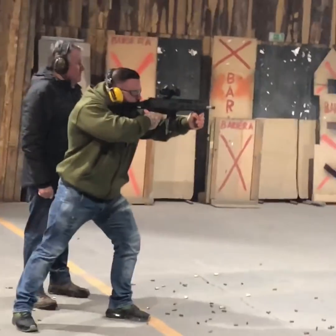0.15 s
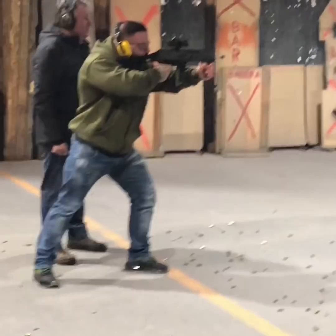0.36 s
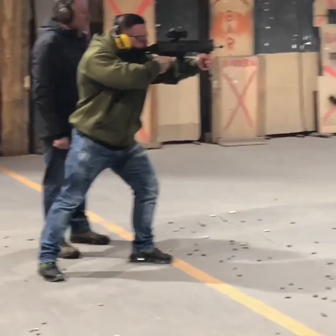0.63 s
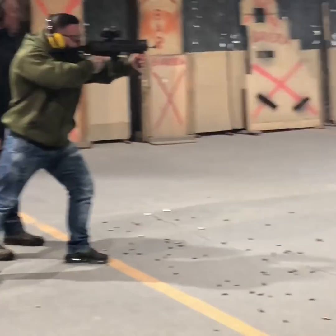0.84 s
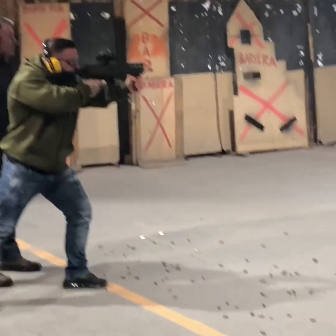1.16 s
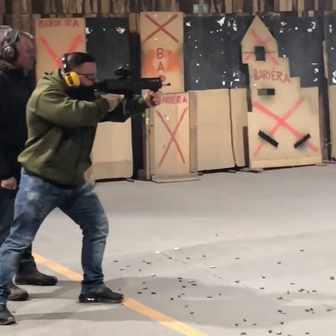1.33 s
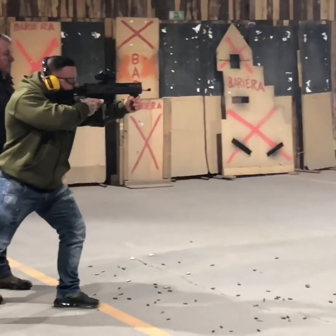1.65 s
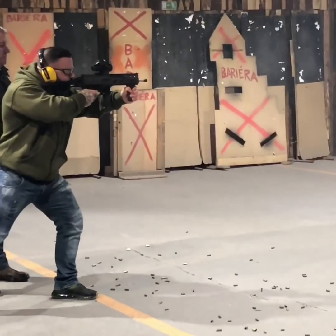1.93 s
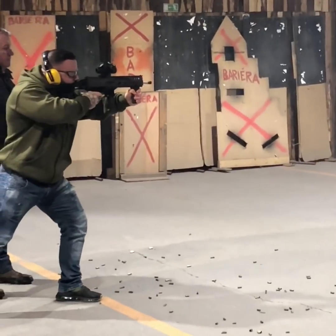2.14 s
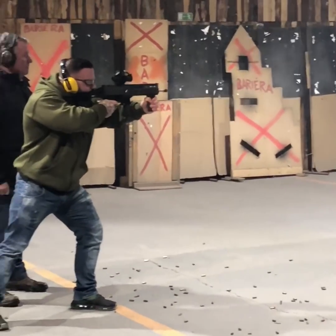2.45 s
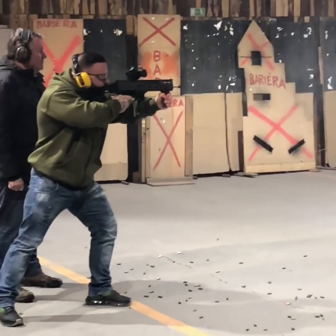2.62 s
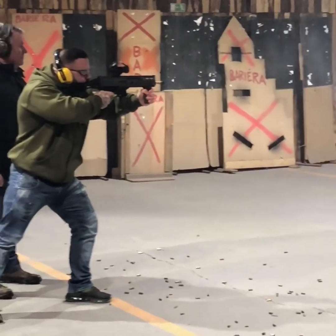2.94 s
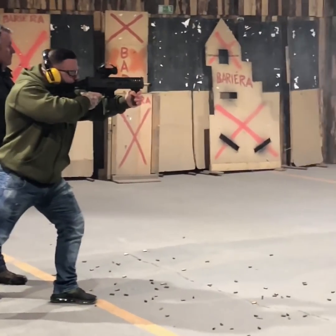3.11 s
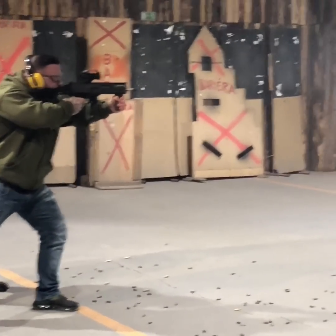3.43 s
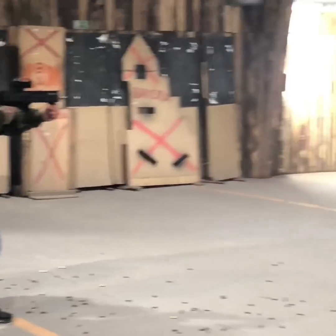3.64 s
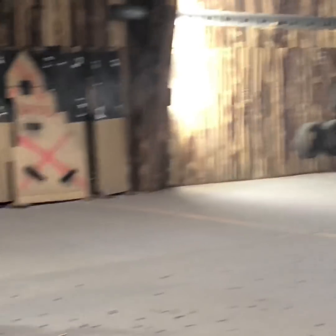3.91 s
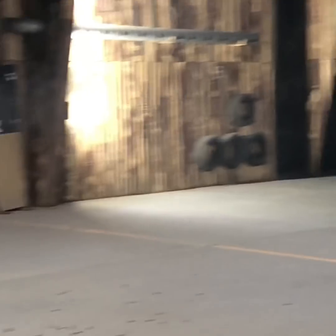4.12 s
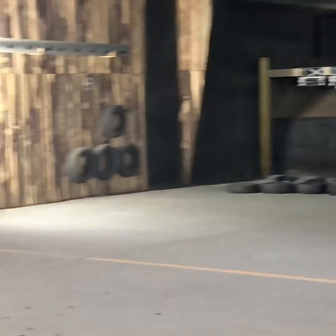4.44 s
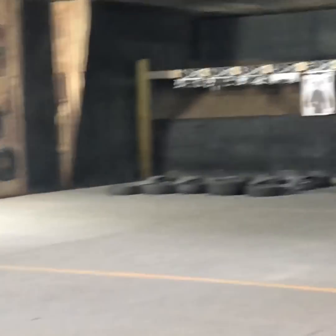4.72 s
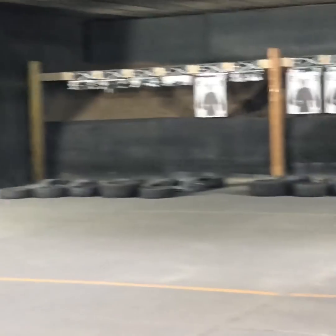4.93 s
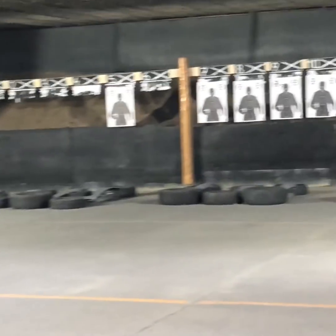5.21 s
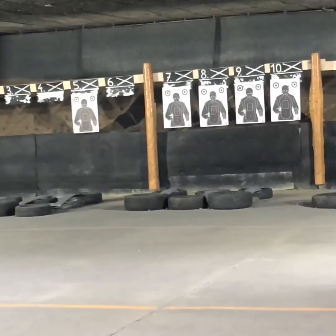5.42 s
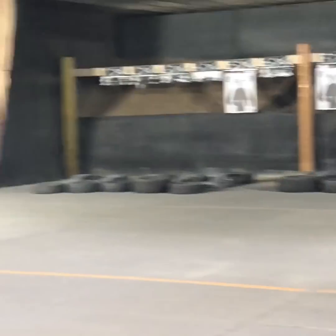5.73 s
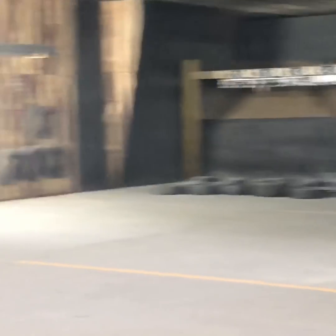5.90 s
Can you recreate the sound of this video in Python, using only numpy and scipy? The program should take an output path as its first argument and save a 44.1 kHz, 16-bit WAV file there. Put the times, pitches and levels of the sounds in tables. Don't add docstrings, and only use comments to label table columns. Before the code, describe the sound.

A phone close to the shooter catches a fading gunshot reverberation, tiny high brass pings and a brief gritty footstep scrape, then a deep fan drone rising as its gain recovers. A rifle cracks hard, thumps and floods the long hall with echoes. After some brass tinkles a second shot comes, with a louder case strike after it, then a third, interrupted by a momentary gap and repeated softer from its start.

```python
import sys
import numpy as np
from scipy import signal
from scipy.fft import rfft, irfft, next_fast_len
from scipy.io import wavfile
from scipy.ndimage import uniform_filter1d

SR = 44100
rng = np.random.default_rng(int(sys.argv[2]) if len(sys.argv) > 2 else 0)


def gain_from_db(level_db):
    decades = np.asarray(level_db, float) / 20
    return 10 ** decades


def unload_wav(signal):
    wavfile.write(
        sys.argv[1],
        SR,
        np.round(np.clip(np.atleast_2d(signal).T, -1, 1) * 32767).astype(np.int16),
    )


N = 267246
TIME = np.arange(N) / SR


def level(x, db):
    return x * gain_from_db(db) / np.sqrt(np.mean(x ** 2))


def colour(x, points):
    hz, db = np.transpose(points)
    size = next_fast_len(len(x))
    f = np.arange(size // 2 + 1) * SR / size + 1
    gain = gain_from_db(np.interp(np.log(f), np.log(hz), db))
    return irfft(rfft(x, size) * gain, size)[:len(x)]


def band(hz, width_hz, count=N):
    resonance = signal.iirpeak(hz, hz / width_hz, fs=SR)
    return level(signal.lfilter(*resonance, rng.standard_normal(count)), 0)


def walk(rate_hz):
    hold = int(SR / rate_hz)
    steps = np.repeat(rng.standard_normal(N // hold + 1), hold)
    smooth = uniform_filter1d(uniform_filter1d(steps, hold), hold)[:N]
    return smooth / smooth.std()


def add(out, x, start_s):
    i = int(start_s * SR)
    out[i:i + len(x)] += x[:len(out) - i]


def sine(hz):
    return np.sin(2 * np.pi * np.cumsum(hz) / SR)


EARLIER_SHOT_S = -0.41
# start_s, thump_stretch (ratio)
SHOTS = [
    (2.4554, 1.02),
    (3.8981, 1.03),
    (5.6418, .92),
    (5.7165, 1.03),
]


def since_shot():
    starts = np.array([EARLIER_SHOT_S] + [row[0] for row in SHOTS])
    which = np.searchsorted(starts, TIME) - 1
    return which, TIME - starts[which]


DUCKED_DB = [-62, -63, -61.5, -58, -60.5]
DUCK_S, WAIT_S, RECOVER_DB_PER_S = 0.18, 0.56, 8.5


def gain_control():
    which, age = since_shot()
    aim_db = np.array(DUCKED_DB)[which] + RECOVER_DB_PER_S * np.maximum(age - WAIT_S, 0)
    k = 1 / (DUCK_S * SR)
    return aim_db[0] + signal.lfilter([k], [1, k - 1], aim_db - aim_db[0])


# pitch_hz, level_db
AIR = [(15, -37.5), (25, -2), (49, -11.5), (74, -8.5), (104, -3.5), (118, -2), (183, -8), (323, -21),
       (429, -31), (555, -23.5), (737, -29), (883, -28.5), (979, -31.5), (2300, -37.5), (12000, -68),
       (15600, -104), (22000, -120)]
# pitch_hz, width_hz, level_db
DUCT = [(99, 28, -3.5), (159, 18, -8), (259.5, 18, -11.5), (307, 12, -19.5), (535, 60, -16),
        (850, 90, -16.5), (1400, 80, -31)]
# pitch_hz, level_db
WHINES = [(231.6, -18), (276, -22.5), (323.7, -20.5), (563.4, -21.5), (792.3, -26.5), (869.6, -22),
          (932, -28)]
FAN_HZ, FAN_DB = 118.7, -0.5


def air():
    rush = level(colour(rng.standard_normal(N), AIR), -2.1) * gain_from_db(.8 * walk(12))
    duct = np.zeros(N)
    for hz, width_hz, db in DUCT:
        duct += gain_from_db(db + 1.8 * walk(4)) * band(hz, width_hz)
    sound = rush + gain_from_db(-8.0) * duct
    sound += gain_from_db(FAN_DB + 2 * walk(3.8)) * sine(FAN_HZ + 2.5 * walk(5))
    for hz, db in WHINES:
        sound += gain_from_db(db + 4.4 * walk(2.8)) * sine(hz + 2.0 * walk(7.3))
    return sound * gain_from_db(gain_control())


# middle_s, spread_s, level_db
SCUFFS = [
    (.87, .03, -78),
    (.897, 0.0036, -72),
    (.93, 0.072, -80.5),
]


def scuff():
    shape = sum(gain_from_db(db) * np.exp(-((TIME - s) / spread) ** 2) for s, spread, db in SCUFFS)
    grit = colour(rng.standard_normal(N), [(500, -12), (1800, 0), (4000, -5), (9000, -14), (16000, -34)])
    return gain_from_db(3.2 * walk(220)) * level(grit, 0) * shape


FAR_WALL_S = 0.082


def hall_smear(sound):
    t = TIME[:SR // 2]
    shape = np.exp(-t / 0.1) * (1 - np.exp(-t / 0.0153))
    shape += 0.2 * np.exp(-((t - FAR_WALL_S) / 0.097) ** 2)
    room = colour(rng.standard_normal(len(t)) * shape,
                  [(3000, -11.5), (4500, -3), (5200, -2.5), (6000, -1), (8000, 3.5), (11000, -7.5), (14000, -22)])
    return sound + gain_from_db(-40.5) * signal.fftconvolve(sound, room)[:N]


# lands_s, ring_hz, second_ring_hz, second_share (ratio)
CASES = [
    (.15, 10460, 10750, 0.93),
    (3.03, 10830, 10600, .15),
    (4.57, 10900, 10900, .15),
]
# start_s, click_db (sharp), tick_db (dull), ring_db
TOUCHES = [(0.1506, -44, -60, -48), (0.162, -46, -64, -56), (0.1675, -34, -62, -73), (0.347, -66, -79, -90),
           (0.4337, -65, -62, -69.5), (0.5333, -50, -56, -61), (0.594, -69, -66, -88),
           (0.6386, -63, -67, -66.5), (0.6996, -63, -77, -68.5), (0.758, -48.5, -65, -69),
           (3.039, -41, -59, -55), (3.0544, -53, -74, -51), (3.2679, -56, -72, -60),
           (3.2802, -57, -69, -59.5), (3.3795, -45, -71, -52.5), (3.441, -65, -76, -85),
           (3.5125, -58, -68, -89), (3.6296, -75, -80, -74.5), (3.7992, -70, -80, -74),
           (4.579, -25, -39.5, -56.5), (4.589, -33, -58, -78), (4.619, -52, -68, -67),
           (5.0237, -37, -53, -61.5), (5.0444, -51, -75, -51), (5.1266, -61, -71.5, -69.5),
           (5.206, -42, -59.5, -79), (5.2365, -58, -69.5, -59), (5.3715, -42, -69, -65.5),
           (5.4015, -66, -73, -60), (5.4576, -62, -74, -67)]
TICK_HZ, TICK_SPREAD_HZ = 5010, 130
MODE_SCATTER_DB, WAVER_DB = 8, 3
SPLASH_DB, SPLASH_S = -24.5, .0025


def cases():
    ticks, rings, t = np.zeros(N), np.zeros(N), TIME[:SR // 3]
    grit = level(colour(rng.standard_normal(SR), [(3000, -20), (7000, -2), (13000, -1.5)]), 0)
    grit *= gain_from_db(6.7 * walk(600)[:SR])
    ring_fade = 0.78 * np.exp(-t / 0.019) + 0.082 * np.exp(-t / 0.038)
    for s, click_db, tick_db, ring_db in TOUCHES:
        b, c, d, e = rng.random(4)
        _, hz, second_hz, share = [case for case in CASES if case[0] <= s][-1]
        tick_hz = TICK_HZ + TICK_SPREAD_HZ * (2 * e - 1)
        tick = np.sin(2 * np.pi * tick_hz * t) * np.exp(-t / .0006) * (1 - np.exp(-t / .00006))
        click = np.sin(2 * np.pi * 9000 * t) * np.exp(-t / .00008)
        click += gain_from_db(SPLASH_DB) * np.roll(grit, int(d * SR))[:len(t)] * np.exp(-t / SPLASH_S)
        ring = np.sin(2 * np.pi * hz * t)
        ring += 0.56 * np.sin(2 * np.pi * ((hz + 25 + 60 * b) * t + c))
        second_gain = share * gain_from_db(MODE_SCATTER_DB * (2 * b - 1))
        ring += second_gain * np.sin(2 * np.pi * (second_hz * t + d))
        swell_s = .006 if tick_db < ring_db - 12 and s > 1 else .001
        add(ticks, gain_from_db(tick_db + 12.5) * tick + gain_from_db(click_db - 11.5) * click, s)
        add(rings, gain_from_db(ring_db) * ring * ring_fade * (1 - np.exp(-t / swell_s)), s)
    return hall_smear(ticks + rings * gain_from_db(WAVER_DB * walk(45)))


# pitch_hz, level_db
ROUGH_FLOOR = [(2000, -4.5), (3400, -2.5), (6500, -3.5), (12000, -11)]
BOUNCE_S, BOUNCE_SHARE = .00073, .75


def bounce(x):
    t = TIME[:len(x)]
    late = np.interp(t - BOUNCE_S, t, x, left=0)
    return x + BOUNCE_SHARE * colour(late, ROUGH_FLOOR)


# release_level_db, swell_db (while held), hold_s
HELD = [(-24, 2, 0.15), (-25.5, 1.5, 0.24), (-21, 3.5, .19), (-20.5, 12.5, 0.044), (-21.5, 3.5, 0.1)]
BEFORE_DB, ARRIVES_S, BUILD_S = -6.5, .030, .0015
LULL_S, LULL_WIDTH_S, LULL_DB = .066, .012, -0.5
RELEASE_DB, RELEASE_S, DECAY_DB_PER_S = 8.5, 0.17, 41


def wash_level(which, age):
    top_db, swell_db, hold_s = np.transpose(HELD)[:, which]
    free_s = np.maximum(age - hold_s, 0)
    held_db = BEFORE_DB / (1 + np.exp(np.minimum((age - ARRIVES_S) / BUILD_S, 50)))
    held_db -= swell_db * np.maximum(1 - age / hold_s, 0)
    held_db += LULL_DB * np.exp(-((age - LULL_S) / LULL_WIDTH_S) ** 2)
    fall_db = RELEASE_DB * (1 - np.exp(-free_s / RELEASE_S)) + DECAY_DB_PER_S * free_s
    return top_db + held_db - fall_db


# (after 1 s, on top of the common decay)
HALL = [(40, -20, 15.5), (100, -14, 23), (231.5, -8.5, 9), (520, -5, 11.5), (648, -2.5, 3), (810, 3.5, 5.5),
        (1130, -0.5, 2.5), (1537, -6.5, 3), (1740, -7.5, 11), (2700, -7, 16), (4260, -8.5, 25.5),
        (6270, -11.5, 36), (10200, -11.5, 70), (15000, -17.5, 102)]
COMBED = [0.55, 0.94, 1, 0.85, 0.32]
FADE_POWER = 0.75
CLUMP_DB, CLUMPS_PER_S = 2.5, 140


def wash():
    which, age = since_shot()
    hz, start_db, loss_db = np.transpose(HALL)
    size = next_fast_len(N)
    noise = rfft(rng.standard_normal(size))
    octave = np.log2(np.arange(size // 2 + 1) * SR / size + 1)
    fade = age ** FADE_POWER
    dull_db, bright_db = (1.6 * walk(rate) * np.exp(-age / .4) for rate in (90, 60))
    out = np.zeros(N)
    for centre in np.log2(40) + np.arange(44) / 5:
        window = np.cos(np.pi / 2 * np.clip(5 * (octave - centre), -1, 1)) ** 2
        part = irfft(noise * window, size)[:N]
        bright = np.clip((centre - np.log2(1200)) / 2.9, 0, 1)
        clumps_db = (1 - bright) * dull_db + bright * bright_db
        band_db = np.interp(centre, np.log2(hz), start_db) - np.interp(centre, np.log2(hz), loss_db) * fade
        out += part * gain_from_db(band_db + clumps_db)
    out = out + np.array(COMBED)[which] * (bounce(out) - out)
    rough_db = CLUMP_DB * walk(CLUMPS_PER_S) * np.exp(-age / 0.17)
    return out * gain_from_db(wash_level(which, age) + rough_db + 14) * (1 - np.exp(-age / 0.0014))


# pitch_hz, level_db
CRACK = [(180, -28.5), (300, -5.5), (2440, -7), (3350, -8), (5610, -5.5), (7820, -9.5), (8360, -13),
         (9550, -9), (16000, -16)]


def burst(length_s, tail_s, rise_s):
    t = TIME[:SR // 40]
    tail = 0.033 * np.exp(-(t - length_s) / tail_s)
    shape = np.where(t < length_s, 1, tail) * np.minimum(t / rise_s, 1) ** 2
    return level(colour(rng.standard_normal(len(t)), CRACK), 0) * shape


# delay_s (after the shot), level_db
ECHOES = [(.0045, -10.5), (0.0089, -3.5), (.032, -17.5), (0.038, -8), (.052, -23.5), (0.079, -18)]
LEAD_S, LEAD_DB = .0042, -27.5
SQUARING = .33


def shot(stretch, crack_db, thump_db, rise_s):
    t = TIME[:SR // 5]
    echoes = np.zeros(len(t))
    for s, db in ECHOES:
        add(echoes, gain_from_db(db) * burst(0.0043, 0.0045, 0.0022), s)
    blast = gain_from_db(crack_db) * colour(bounce(echoes), [(1500, 0.5), (12000, -6.0)])
    swings = np.log((t + 1 / SR) / (.0052 * stretch)) / np.log(1.47)
    thump = np.cos(np.pi * swings) * (1 - np.exp(-(t / 0.0048) ** 2)) * np.exp(-(t / 0.025) ** 0.99)
    blast += gain_from_db(thump_db) * thump * (1 - np.exp(-(t / rise_s / 5) ** 2))
    crack = colour(burst(.0040, .002, .0007),
                   [(350, 4.5), (800, 5), (1800, 4.5), (5000, 1.0), (8000, 0.5), (14000, 0.0)])
    add(blast, gain_from_db(crack_db + 12) * np.tanh(SQUARING * crack), 0)
    lead = gain_from_db(crack_db + LEAD_DB) * rng.standard_normal(int(LEAD_S * SR))
    return np.concatenate([lead, blast])


# crack_db, thump_db, thump_rise_s
BLOWS = [(-13.5, -12, 0.00058), (-16, -12.5, 0.00074), (-15.5, -13, 0.00056), (-24.5, -15, 0.0031)]
# fade_out_start_s, fade_out_end_s, fade_in_start_s, fade_in_end_s
DROPOUT_S = (5.676, 5.704, 5.7125, 5.742)


def scene():
    out_start, out_end, in_start, in_end = DROPOUT_S
    before = np.interp(TIME, [out_start, out_end], [1, 0]) ** 2.5
    after = np.interp(TIME, [in_start, in_end], [0, 1]) ** 2.2
    first_blasts, repeated_blast = np.zeros((2, N))
    for (s, stretch), blow in zip(SHOTS, BLOWS):
        target = repeated_blast if s > out_end else first_blasts
        add(target, shot(stretch, *blow), s - LEAD_S)
    rest = air() + scuff() + cases() + wash()
    mix = (rest + first_blasts) * before + rest * after + repeated_blast * (TIME > in_start)
    return mix[None]


def band_limit(x):
    return signal.sosfilt(signal.butter(12, 16810, fs=SR, output="sos"), x)


def record(dry):
    rounded = 0.99 * np.tanh(dry / 0.79)
    top_cut = signal.ellip(8, .2, 50, 15900, fs=SR, output="sos")
    return band_limit(signal.sosfilt(top_cut, rounded))


dry = scene()
out = record(dry)
unload_wav(out)
```